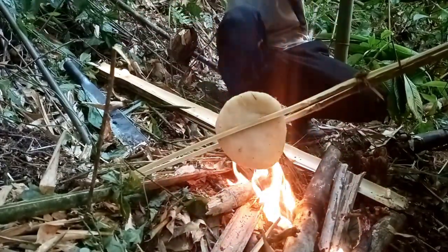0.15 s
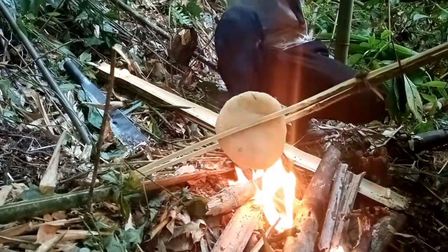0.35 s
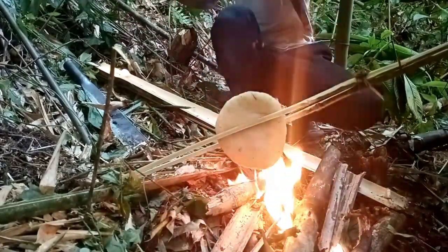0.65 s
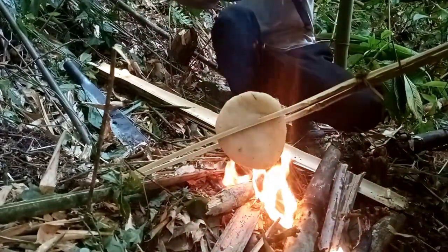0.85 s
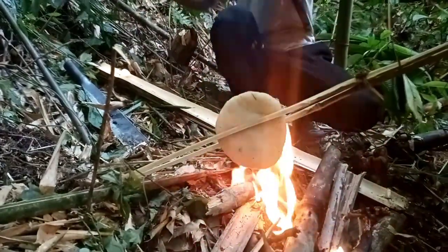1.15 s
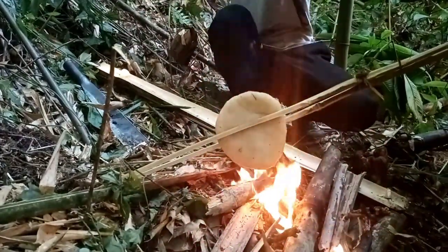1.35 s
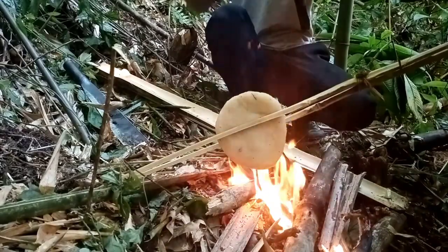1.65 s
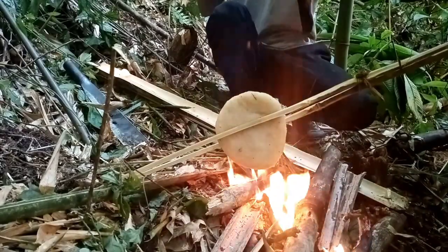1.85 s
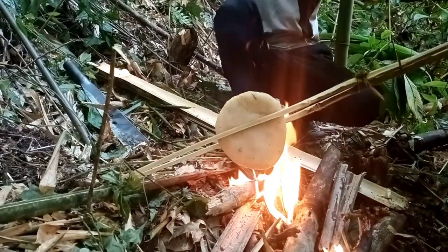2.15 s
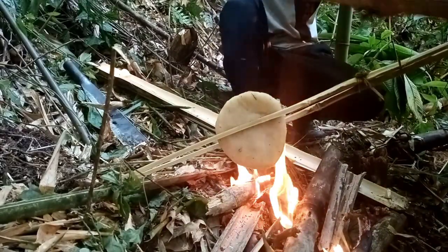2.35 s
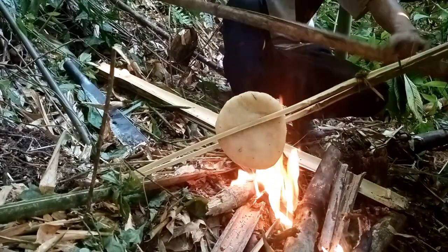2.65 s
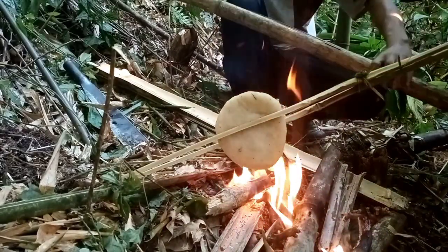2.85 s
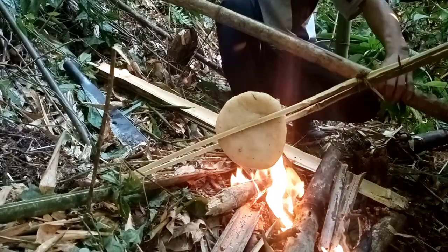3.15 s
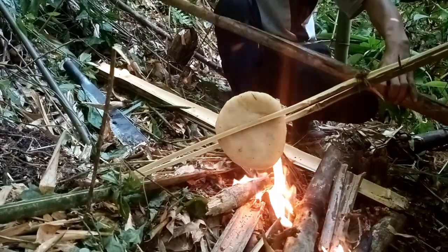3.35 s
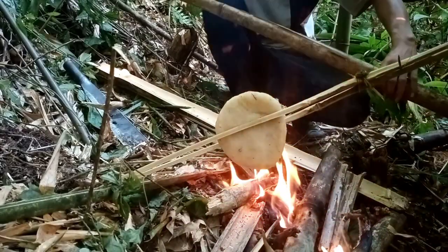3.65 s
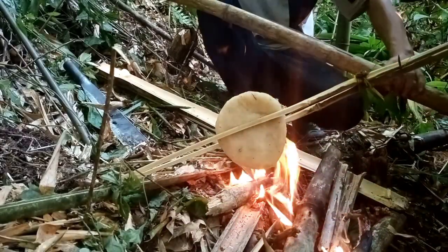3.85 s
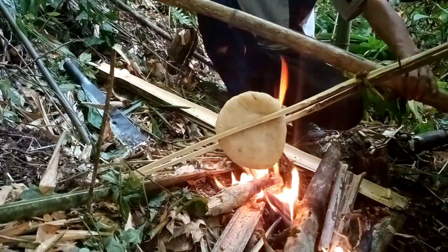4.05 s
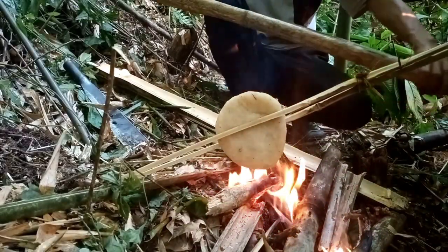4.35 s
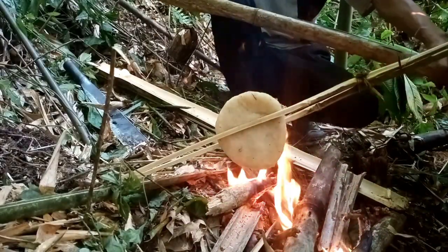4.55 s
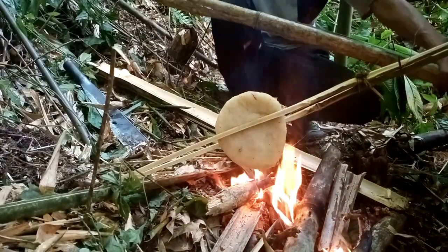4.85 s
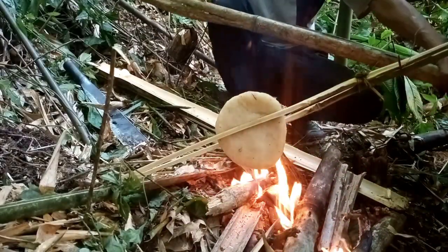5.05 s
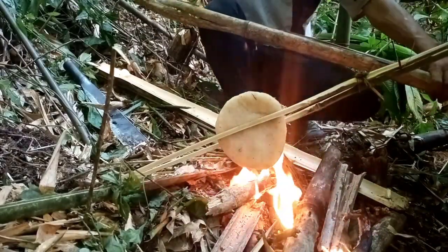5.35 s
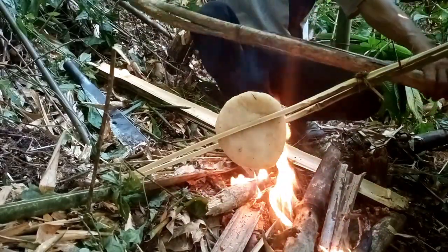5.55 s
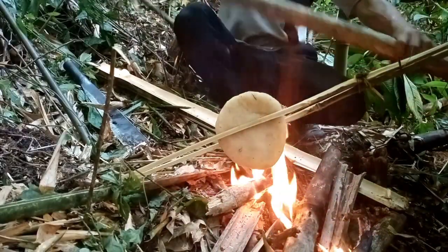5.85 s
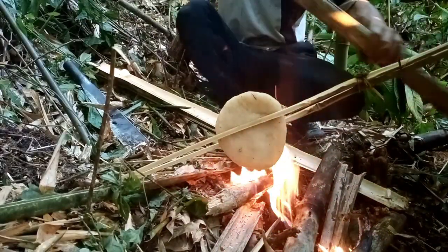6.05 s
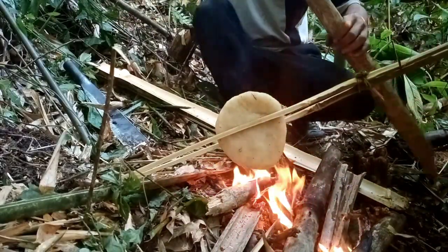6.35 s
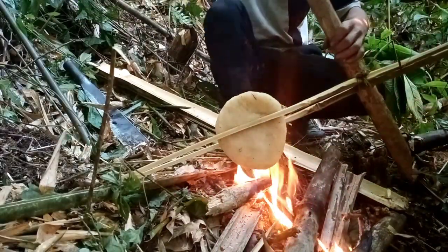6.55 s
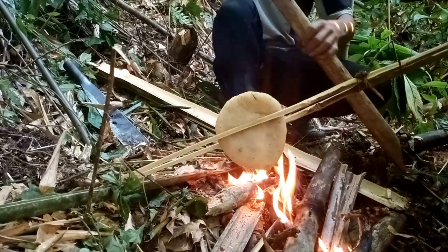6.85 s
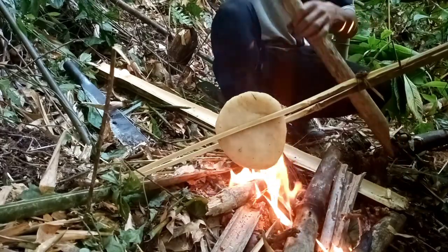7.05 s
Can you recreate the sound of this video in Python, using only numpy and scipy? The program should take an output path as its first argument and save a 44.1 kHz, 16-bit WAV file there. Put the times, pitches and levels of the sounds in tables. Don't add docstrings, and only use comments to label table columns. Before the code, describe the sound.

A dry bamboo pole scrapes through leaf litter beside a softly fluttering campfire, knocks wood, then cracks and splinters in loud, sharp, clustered pops.

```python
import sys
import numpy as np
from scipy import signal
from scipy.fft import rfft, irfft
from scipy.io import wavfile
from scipy.ndimage import uniform_filter1d

SR = 44100
rng = np.random.default_rng(int(sys.argv[2]) if len(sys.argv) > 2 else 0)


def decibels_to_gain(level_db):
    exponent = np.asarray(level_db, float) / 20
    return 10 ** exponent


def file_out(sig):
    cols = np.atleast_2d(sig).T
    lim = np.clip(cols, -1, 1)
    pcm = np.round(lim * 32767).astype(np.int16)
    wavfile.write(sys.argv[1], SR, pcm)


N = 316638

# frequency_hz, density_db [dB per Hz]
LEAF_SPECTRUM = [(2650, -10), (4500, -16), (5290, -18), (8030, -4.5), (9430, -4.5), (12500, -16),
                 (15100, -22.5), (15500, -22), (15650, -63.5)]
# frequency_hz, density_db [dB per Hz]
TWIG_SPECTRUM = [(530, -44), (900, -12.5), (1330, -3), (1770, 1), (3610, -2), (5040, -41), (6000, -6.5),
                 (7800, -19), (13200, -120)]
# frequency_hz, width_hz, level_db
TUBE_MODES = [(488.6, 19, -1.5), (596.6, 35, 1), (803, 183, -1.5), (1068, 140, -2), (1408, 140, 0)]
# frequency_hz, width_hz, level_db
WALL_MODES = [(1860, 116, 6.5), (2320, 370, 4.5), (2514, 160, 9.5), (2760, 330, 4), (3280, 503, 8),
              (3540, 366, 8), (3717, 138, 9), (4074, 670, 6), (4340, 940, -3.5)]
# time_s, effort_db (twig rustle), tube_pressure_db (on the ground, re effort)
DRAG_EFFORT = [(0.0, -45, -7), (0.08, -40.5, -10), (0.6, -49.5, -5.5), (0.86, -55, -6), (0.94, -45, -9),
               (1.52, -36.5, -7), (2.3, -38, -6.5), (2.9, -47.5, -9), (3.6, -48, -9.5), (3.66, -33, -18),
               (4.16, -35, -17), (4.4, -44.5, -14), (5.02, -50.5, -20), (5.45, -30.5, -34),
               (5.72, -36, -23), (5.8, -41.5, -11), (6.02, -52, -7), (7.18, -50.5, -7)]
# centre_s, twigs_extra_db, leaves_extra_db, half_length_s
FOOTSTEPS = [(1.32, 0.5, 4.5, 0.12), (2.25, 2, 4, 0.73), (3.2, 3, 8.5, 0.24), (3.8, 0.5, 9, 0.032),
             (3.88, -5.5, -4.5, 0.17), (4.22, 0, 9, 0.043), (4.33, 8.5, 9, 0.045), (4.42, -5, 4, 0.07),
             (4.7, 14, 15, 0.085), (5.02, 3, 10.5, 0.11), (5.18, 1, 12, 0.059), (5.56, 8.5, 6.5, 0.051),
             (5.72, 11.5, 6, 0.031), (6.28, 3.5, 2, 0.34), (6.92, 5.5, 5, 0.14)]


def in_time(rows):
    s, *columns = np.transpose(rows)
    return [np.interp(np.arange(N) / SR, s, column) for column in columns]


def swells(rows):
    t = np.arange(N) / SR
    return sum(np.outer(extra_db, np.exp(-((t - s) / half_s) ** 2)) for s, *extra_db, half_s in rows)


def rms_one(x):
    return x / np.sqrt(np.mean(x ** 2) + 1e-20)


def drift(per_s):
    steps = rng.standard_normal(4000)
    return np.interp(np.arange(N) / SR * per_s % 3999, np.arange(4000), steps)


def gritty(spread_db):
    grain_db = spread_db * np.minimum(rng.exponential(1, N), 6)
    return rms_one(rng.standard_normal(N) * decibels_to_gain(grain_db))


def coloured(spectrum, x):
    hz, level_db = np.transpose(spectrum)
    grid_hz = np.fft.rfftfreq(N, 1 / SR) + 1
    gain_db = np.interp(np.log(grid_hz), np.log(hz), level_db, -90, -90)
    return rms_one(irfft(rfft(x) * decibels_to_gain(gain_db), N))


def resonate(x, modes, patchy_db, per_s):
    out, power = 0, 0
    for k, (hz, width_hz, level_db) in enumerate(modes):
        r = np.exp(-np.pi * width_hz / SR)
        b = decibels_to_gain(level_db) * (1 - r * r) / 2 * np.array([1, 0, -1])
        a = [1, -2 * r * np.cos(2 * np.pi * hz / SR), r * r]
        mode = signal.lfilter(b, a, x + 1e-18)
        out = out + (-1) ** k * mode * decibels_to_gain(patchy_db * drift(per_s))
        power += decibels_to_gain(2 * level_db) * np.pi * width_hz / SR
    return out / np.sqrt(power)


def blows(table, rise_s, rough):
    out, t = np.zeros(N + SR), np.arange(SR // 3) / SR
    overtones = np.exp(rng.uniform(0.12, 1, (len(table), 5)) * 1.3)[:, :, None]
    for (s, level_db, hz, t60), ratios in zip(table, overtones):
        fall_db = -60 * (t / max(t60, .01)) ** 0.89
        ring = np.sin(2 * np.pi * hz * t) * decibels_to_gain(fall_db)
        higher = np.sin(2 * np.pi * hz * ratios * t) * decibels_to_gain(fall_db * ratios) / ratios
        ring += rough * higher.sum(axis=0)
        at = round(s * SR)
        out[at:at + len(t)] += decibels_to_gain(level_db) * (1 - np.exp(-t / rise_s)) * ring
    return out[:N]


def flame():
    # time_s, level_db
    flutter = [(0.0, -50), (0.22, -49.5), (0.42, -54.5), (0.55, -53.5), (0.84, -53.5), (1.0, -55),
               (1.4, -50.5), (1.68, -54), (2.18, -52.5), (2.78, -53.5), (3.36, -46.5), (3.48, -52),
               (4.5, -56), (5.28, -63), (5.6, -42), (5.78, -54), (6.82, -52.5), (7.18, -53.5)]
    # frequency_hz, density_db [dB per Hz]
    flutter_spectrum = [(12, -58), (20, -25.5), (27, -26), (70, -7.5), (118, -0.5), (223, -6.5),
                        (362, -10.5), (500, -16), (650, -22), (1100, -120)]
    noise = coloured(flutter_spectrum, rng.standard_normal(N))
    return noise * decibels_to_gain(in_time(flutter)[0] + 3.46 * drift(21))


def snap_ticks():
    # start_s, peak_db, lowest_hz
    tick_events = [(.568, -31, 5000), (.744, -38, 7500), (0.8773, -29, 3500), (.9055, -35, 7500),
                   (.928, -48, 9500), (3.7446, -21.5, 5000), (3.7707, -20, 6500), (3.8061, -21, 6500),
                   (3.812, -24, 7000), (3.852, -30, 7000), (3.9617, -24, 4500), (3.9722, -23, 5500),
                   (3.9937, -17, 4000), (4.0435, -33, 8000), (4.1972, -4, 2500), (4.219, -24, 8000),
                   (4.25, -28, 7000), (4.4147, -26, 5000), (4.4506, -38, 7000), (4.484, -36, 11000),
                   (4.541, -30, 5000), (5.3722, -16, 4000), (5.4205, -12, 2000), (5.2455, -16, 5000),
                   (5.7197, -16, 6000), (5.5114, -3, 1200), (5.9635, -14, 2000), (5.9655, -19, 5500),
                   (7.135, -38, 8000)]
    # start_s, peak_db, lowest_hz
    more_ticks = [(2.8629, -16, 5500), (2.9382, -20, 5500), (4.9172, -26, 5500), (4.9694, -23, 5500),
                  (5.0394, -25, 5500), (5.2091, 2, 5500), (5.2574, 2, 5500), (5.3198, -19, 5500),
                  (5.4504, 1, 5500), (5.897, -34, 5500), (6.1144, -35, 5500), (6.125, -24, 5500),
                  (6.1779, -27, 5500), (6.2332, -40, 5500), (6.9287, -27, 5500), (7.1651, -30, 5500)]
    echo_s, echo_db = .0009, -6
    out, pair = np.zeros(N + SR), np.zeros(400)
    pair[0], pair[round(echo_s * SR)] = -3.5, 3.2 * decibels_to_gain(echo_db)
    for s, level_db, low_hz in tick_events + more_ticks:
        band_hz = [low_hz, min(low_hz + 7000, 15000)]
        click = signal.sosfilt(signal.butter(2, band_hz, "band", fs=SR, output="sos"), pair)
        at = round(s * SR)
        out[at:at + len(pair)] += decibels_to_gain(level_db) * click
    return out[:N]


def crackle():
    per_s, re_effort_db = 45, 8
    sizes = decibels_to_gain(3.3 * np.minimum(rng.exponential(1, N), 3)) * rng.choice([-1, 1], N)
    happens = rng.random(N) < per_s / SR
    level_db = in_time(DRAG_EFFORT)[0] + swells(FOOTSTEPS)[1] / 2 + re_effort_db
    clicks = sizes * happens * decibels_to_gain(level_db)
    return signal.sosfilt(signal.butter(2, [2200, 11000], "band", fs=SR, output="sos"), clicks + 1e-18)


def thumps():
    # start_s, level_db, pitch_hz, t60_s
    pushes = [(0.439, -44, 143, 0.46), (0.467, -42, 137, 0.26), (3.996, -46, 146, 0.064),
              (4.198, -36, 151, 0.026), (4.302, -52, 200, 0.013), (4.564, -20, 143, 0.0091),
              (4.5798, -9, 79.5, 0.028), (4.655, -33, 152, 0.02), (5.082, -30, 188, 0.018),
              (5.27, -26, 195, 0.025), (5.5119, -5.5, 82.4, 0.027)]
    out, t = np.zeros(N + SR), np.arange(SR // 3) / SR
    for s, level_db, hz, t60 in pushes:
        turns = hz * t + .48 * (1 - np.exp(-t / .001))
        at = round(s * SR)
        out[at:at + len(t)] -= decibels_to_gain(level_db - 60 * t / t60) * np.sin(2 * np.pi * turns)
    return signal.sosfilt(signal.butter(2, 55, "high", fs=SR, output="sos"), out[:N])


def drag():
    # centre_s, extra_db, half_length_s
    scuffs = [(1.501, 4, 0.029), (1.577, 4, 0.012), (1.66, 5.5, 0.032), (1.883, 7, 0.022),
              (2.173, 7, 0.0085), (2.376, 8, 0.017), (2.639, 15, 0.02), (2.757, 16, 0.015),
              (2.864, 18, 0.017), (3.796, 8, 0.032), (4.037, 6.5, 0.0095), (4.79, 5, 0.032)]
    # centre_s, extra_db, half_length_s
    groans = [
        (3.2, 10, .1),
        (3.92, 7, 0.14),
        (5.59, 32.5, 0.036),
    ]
    leaf_re_effort_db = -6
    lift_s, lower_s, lifted_leaf_db = 2.626, 4.19, -6

    effort_db, pressure_db = in_time(DRAG_EFFORT)
    scuff_db = swells(scuffs)[0]
    tread_twig_db, tread_leaf_db = swells(FOOTSTEPS)
    t = np.arange(N) / SR
    lifted = uniform_filter1d(1.0 * ((t > lift_s) & (t < lower_s)), size=4000)
    tube_db = effort_db + pressure_db + swells(groans)[0]
    twig_db = effort_db + tread_twig_db
    leaf_db = effort_db + leaf_re_effort_db + lifted_leaf_db * lifted + tread_leaf_db
    jolt_db = .9 * drift(25) + .7 * drift(70)

    damped = [(hz, 1.6 * width_hz, level_db) for hz, width_hz, level_db in TUBE_MODES]
    rubbing = gritty(2.0) * decibels_to_gain(tube_db + 0.92 * scuff_db + jolt_db)
    tube = resonate(rubbing, damped, patchy_db=3.0, per_s=13)
    rustle = decibels_to_gain(twig_db + scuff_db + jolt_db + 1.0 * drift(60))
    wall = decibels_to_gain(-6) * resonate(gritty(1.1) * rustle, WALL_MODES, patchy_db=3.0, per_s=20)
    twigs = decibels_to_gain(-10.5) * coloured(TWIG_SPECTRUM, gritty(2.4)) * rustle
    hiss = decibels_to_gain(leaf_db + 0.47 * scuff_db + jolt_db + 0.85 * drift(70))
    leaves = coloured(LEAF_SPECTRUM, gritty(2.66)) * hiss
    return tube + wall + twigs + leaves


def catches():
    # start_s, peak_db, pitch_hz, t60_s
    node_hits = [(1.3409, -29, 1360, 0.059), (1.5529, -27, 1260, 0.05), (1.5808, -24, 1270, 0.055),
                 (1.6263, -27, 3010, 0.05), (1.6532, -27, 1480, 0.05), (1.7094, -28.5, 1420, 0.05),
                 (1.7853, -26, 1570, 0.05), (1.8592, -30, 1380, 0.05), (1.8752, -25.5, 1350, 0.046),
                 (1.9959, -31, 2240, 0.05), (2.2209, -29, 3340, 0.05), (2.2349, -23, 3210, 0.05),
                 (2.3671, -27, 1710, 0.05), (2.4005, -25, 1810, 0.055)]
    return decibels_to_gain(-4.5) * blows(node_hits, rise_s=0.0028, rough=0.3) * decibels_to_gain(3.0 * drift(300))


def knocks():
    # start_s, peak_db, pitch_hz, t60_s
    strikes = [(0.942, -40, 590, 0.077), (1.067, -42, 750, 0.08), (1.181, -36.5, 1490, 0.13),
               (1.225, -39, 1340, 0.14), (2.726, -37, 1400, 0.078), (3.155, -9.5, 614, 0.029),
               (3.349, -17.5, 490, 0.058), (3.621, -26, 810, 0.15), (3.685, -19, 597, 0.12),
               (4.578, -21, 675, 0.06), (4.606, -21.5, 623, 0.064), (4.756, -35, 614, 0.1),
               (5.271, -18, 616, 0.075), (5.483, -5.5, 523, 0.039), (5.721, -12.5, 1396, 0.055),
               (6.423, -20, 1146, 0.096), (6.494, -32, 890, 0.13), (6.494, -36, 1350, 0.072),
               (6.423, -19.5, 767, 0.083), (6.423, -26.5, 1417, 0.1), (6.554, -42.5, 1170, 0.1),
               (6.861, -35.5, 1187, 0.079)]
    # start_s, peak_db, pitch_hz, t60_s
    further_modes = [(3.155, -21, 750, .025), (3.155, -23.5, 1055, 0.038), (3.349, -21.5, 840, 0.045),
                     (3.349, -29, 1066, .06), (3.358, -26, 900, .05), (3.366, -23, 500, 0.043),
                     (3.349, -32, 2500, 0.037), (1.812, -32.5, 596, 0.061), (1.888, -33, 570, 0.068),
                     (5.475, -12.5, 887, 0.028), (5.7205, -8.5, 1050, 0.025), (5.7205, -13, 703, .035),
                     (6.423, -19, 1330, 0.055), (6.423, -24, 872, 0.1), (6.438, -30, 900, .06),
                     (6.494, -28, 1130, 0.044), (6.494, -29, 725, 0.043), (6.423, -30, 2030, 0.047),
                     (5.377, -25, 1900, 0.044), (3.945, -36, 2350, .15)]
    main = decibels_to_gain(-0.5) * blows(strikes, rise_s=0.00059, rough=0.15)
    return main + blows(further_modes, rise_s=0.00066, rough=0.1)


def pings():
    # start_s, peak_db, pitch_hz, t60_s
    splinters = [(2.7836, -11, 3400, 0.049), (2.863, -22.5, 2382, 0.11), (2.9382, -25, 3560, 0.068),
                 (3.1822, -26, 3640, 0.045), (3.6918, -1, 3935, 0.042), (3.6949, 2, 3800, 0.023),
                 (3.7848, -20.5, 3770, 0.13), (4.1954, -7.5, 3280, 0.027), (4.5625, -18, 1840, 0.088),
                 (4.579, -13.5, 1800, 0.1), (4.6548, -14.5, 3520, 0.11), (4.9957, -29, 4093, 0.05),
                 (5.0804, -15, 1868, 0.082), (4.6548, -22, 2600, 0.12), (5.0884, -10, 3610, 0.058),
                 (5.2123, -20, 2820, 0.11), (5.2699, -2.5, 3150, 0.034), (5.3717, -18, 1810, 0.035),
                 (5.472, -13, 2314, 0.11), (5.697, -0.5, 3340, 0.044), (6.3056, -33, 3302, 0.049),
                 (6.4244, -21, 1910, 0.038), (6.6328, -39, 3720, 0.056), (6.7471, -34.5, 3800, 0.042)]
    # start_s, peak_db, pitch_hz, t60_s
    thin_splinters = [
        (3.964, -31, 6430, 0.066),
        (5.963, -30, 5500, 0.018),
    ]
    rattle = decibels_to_gain(4.0 * drift(450))
    return decibels_to_gain(-5.5) * blows(splinters + thin_splinters, rise_s=0.00038, rough=0.17) * rattle


def snaps():
    # start_s, body_peak_db, splinter_edge_db (re body), hollow_ring_db (re body)
    clean = [(0.0538, -38, 7.5, -18), (0.065, -37, 8, -20.5), (0.0862, -28.5, 0.5, -27),
             (0.568, -40, 8, -22), (0.8769, -38, 7, -25), (0.9055, -55, 9, -18), (1.811, -33, 5, -5),
             (3.6914, -5.5, -7.5, -39), (3.695, -3, -18, -22.5), (3.9734, -29, -6, -12),
             (3.9937, -25.5, 5, -10), (4.4152, -48, 19, -21), (4.8414, -42.5, 15, -25),
             (4.9234, -40, 9, -7), (5.0805, -2, 1, -29.5), (5.087, -16, 3.5, -40), (5.2228, -16, -9, -38),
             (5.2564, -24, -12, -34), (5.2705, 2, -1.5, -22), (5.2, -40, 12, -31), (5.3722, -26, 7.5, -16),
             (5.4005, -23, 9, -25), (5.451, -8.5, 0, -41), (5.5244, -13, -23, -16), (5.7199, -12.5, -1, -7),
             (5.9632, -27, 3.5, -15), (6.1254, -52, 14, -11), (6.929, -34.5, 3.5, -30),
             (7.135, -45, 12, -16)]
    brittle = [(0.0434, -43, 11, -16), (1.1367, -39.5, 11, -18), (1.1744, -36.5, 15.5, -18),
               (1.9747, -31, 8, -16), (2.9379, -23.5, -4.5, -14), (3.1535, -36.5, -16, 9.5),
               (3.785, -18, -8, -24), (4.2834, -20.5, -2, -25), (4.5268, -31, 8, -6),
               (4.5624, -4.5, 1.5, -20), (4.579, -2, -5, -18.5), (4.6551, -6, 3, -17),
               (4.9955, -26, 9, -21), (5.0384, -31, -2, -23), (5.2104, -6, 3, -14), (5.2455, -19, 12, -39),
               (5.3944, -38, 12, -18), (5.5114, -8, 3, -20), (5.6081, -28, 12, -10), (5.484, -9, -9, -20),
               (4.541, -37, 8, -22), (6.427, -24.5, -14, -14), (6.4941, -42, -4, 5), (6.5494, -43.5, 7, -7)]
    torn = [(3.0474, -47, 9, -6), (3.3475, -25, -19, -6), (3.492, -33.5, -3, -26), (3.6167, -24, -12, -1.5),
            (3.6755, -10, -5, -16.5), (3.9633, -23, -6, -36), (4.1683, -23.5, 9.5, -22),
            (4.1972, -6, -0.5, -22), (4.193, -25.5, 2, -20), (4.3034, -11, 5, -15), (4.372, -35, 6, -35),
            (4.5684, -20, 2, -25), (5.4205, -8.5, 2.5, -12), (5.472, -5, -2.5, -19.5),
            (5.68, -12.5, -18, -4), (6.178, -38, 2.5, -15)]
    ripped = [(0.1435, -33.5, -1, -9.5), (2.7694, -31, 6.5, -24), (2.7823, -22, -21, -25),
              (2.8622, -22, -4, -35), (3.1816, -27, -4, -18), (3.7554, -26, -3, -16),
              (3.7707, -31.5, 8, -20), (4.068, -21, -14, -10.5), (4.085, -29.5, -17, -6.5),
              (3.214, -32.5, -9, -14), (5.575, -25, -10, -17), (3.358, -34, -15, -2), (4.596, -13, -6, -34),
              (4.8043, -34, 2.5, -16), (4.9374, -38, 7, -13.5), (5.4149, -15.5, 3.5, -42),
              (5.5164, -17.5, -5, -5), (5.697, -17, -12, -13), (5.9174, -32.5, -18, -22),
              (6.0107, -34.5, 3, -15), (6.294, -36.5, 0, -18), (6.7475, -44, -4, -4),
              (6.8962, -40, 2.5, -3)]
    # t60_s, tail share 0-1
    kinds = ((clean, (0.1, 0.19)), (brittle, (0.081, 0.3)), (torn, (0.074, 0.62)), (ripped, (0.21, 0.48)))

    t = np.arange(SR // 3) / SR
    shapes = np.zeros((5, N + SR))
    opening = 1 - np.exp(-t / .00015)
    crack = 0.43 * decibels_to_gain(-60 * t / 0.023) + 1.6 * decibels_to_gain(-60 * t / 0.0027)
    for rows, (t60, share) in kinds:
        for s, body_db, edge_db, hollow_db in rows:
            at = round(s * SR)
            upper_db = np.minimum(hollow_db, 0.75 * hollow_db)
            parts = ((hollow_db - 2.5, 2.2), (upper_db - 2.5, 0.9), (-4.5, 0.86), (edge_db - 4, 1.2))
            for part, (level_db, last) in enumerate(parts):
                shape = (1 - share) * crack + share * decibels_to_gain(-60 * t / (t60 * last))
                shapes[part, at:at + len(t)] += decibels_to_gain(body_db + level_db) * shape * opening
            shapes[4, at] += decibels_to_gain(body_db + max(edge_db, -6.0) - 3.0)

    low, upper, body, edge, first = shapes[:, :N]
    click = signal.sosfilt(signal.butter(2, [1400, 11000], "band", fs=SR, output="sos"), first + 1e-18)
    tube = resonate(gritty(2.6) * low, TUBE_MODES[:3], patchy_db=6.0, per_s=14)
    tube += resonate(gritty(3.0) * upper, TUBE_MODES[3:], patchy_db=3.5, per_s=14)
    tearing = gritty(2.8) * body * decibels_to_gain(4.9 * drift(350))
    wall = resonate(tearing, WALL_MODES, patchy_db=3.0, per_s=30)
    splinters = coloured(LEAF_SPECTRUM, gritty(2.5)) * edge * decibels_to_gain(4.23 * drift(500))
    crunch = decibels_to_gain(-6.5) * coloured(TWIG_SPECTRUM, gritty(1.4)) * body * decibels_to_gain(0.91 * drift(400))
    return click + tube + wall + crunch + splinters


def scene():
    background = flame() + snap_ticks() + crackle()
    pole = thumps() + drag() + catches() + knocks() + pings() + snaps()
    return (background + pole)[None]


def band_limit(x):
    return signal.sosfilt(signal.butter(12, 16360, fs=SR, output="sos"), x)


def record(dry):
    # close_s, open_s, depth_db
    gate = [
        (0.253, 0.368, -11.5),
        (0.62, 0.671, -6.5),
        (0.676, 0.859, -13.5),
        (0.856, 0.903, -4.5),
        (2.433, 2.53, -2.5),
        (3.01, 3.155, -9),
        (3.288, 3.351, -7),
        (3.436, 3.484, -6.5),
        (3.534, 3.603, -6.5),
    ]
    t = np.arange(N) / SR
    gate_db = sum(depth_db * ((t > closes) & (t < opens)) for closes, opens, depth_db in gate)
    hiss = decibels_to_gain(-79) * coloured([(60, 0), (15500, -3), (15650, -60)], rng.standard_normal(N))
    gated = dry * decibels_to_gain(uniform_filter1d(gate_db, size=400)) + hiss
    cut = signal.sosfilt(signal.cheby2(10, 50, 16300, fs=SR, output="sos"), gated)
    mix = np.clip(1.525 * np.tanh(cut / 1.495), -1, 1)
    return band_limit(mix)


dry = scene()
out = record(dry)
file_out(out)
```